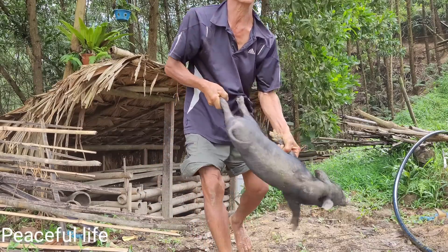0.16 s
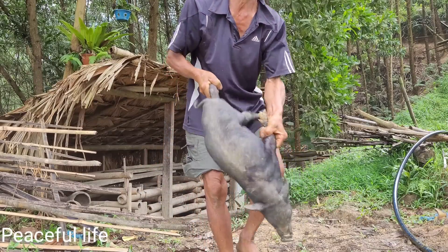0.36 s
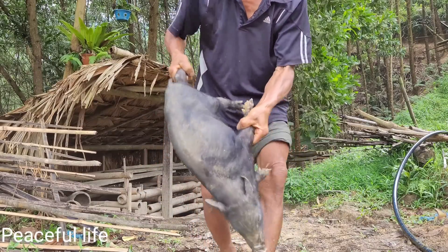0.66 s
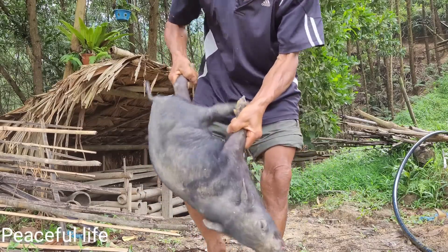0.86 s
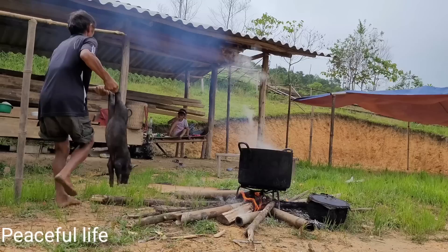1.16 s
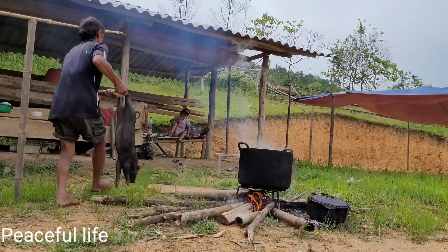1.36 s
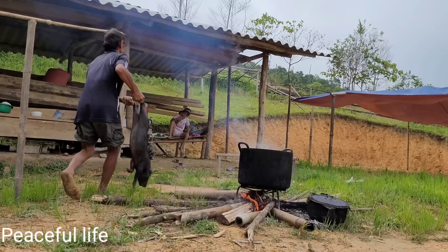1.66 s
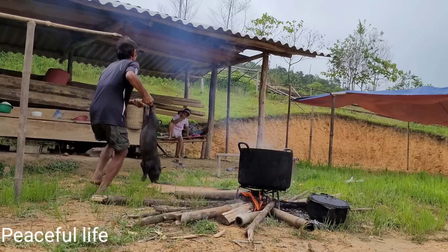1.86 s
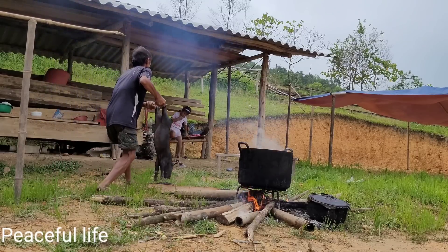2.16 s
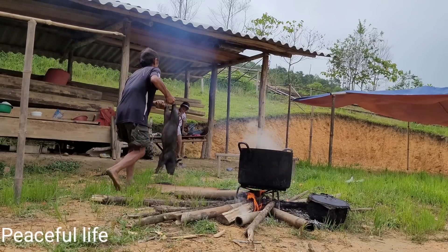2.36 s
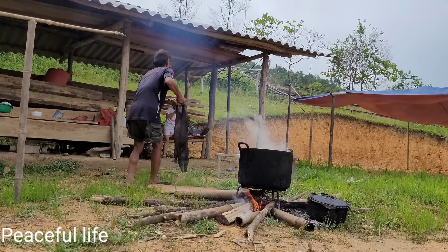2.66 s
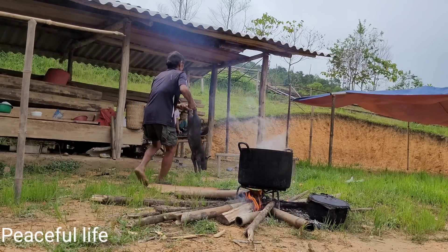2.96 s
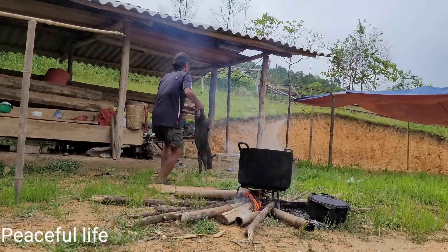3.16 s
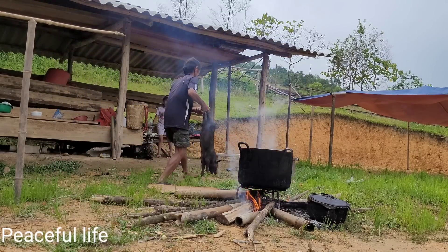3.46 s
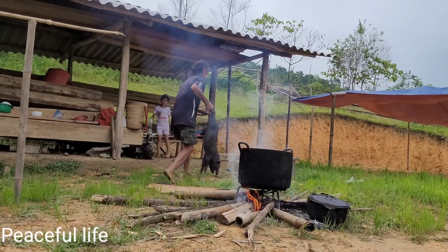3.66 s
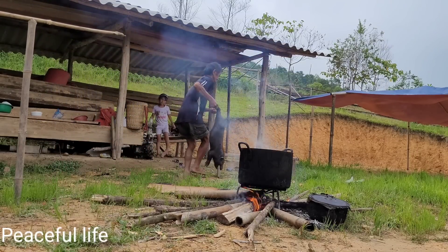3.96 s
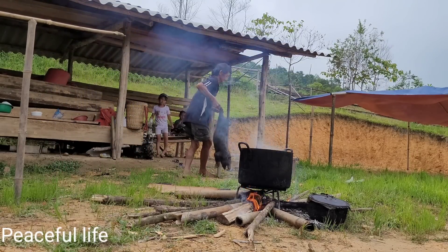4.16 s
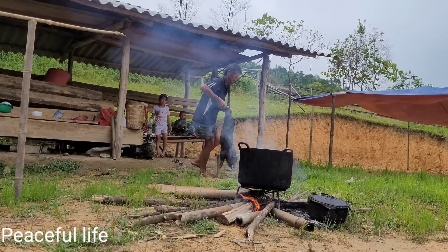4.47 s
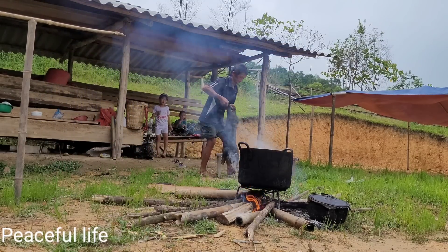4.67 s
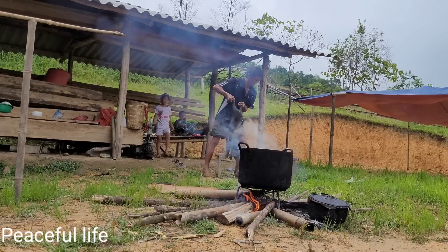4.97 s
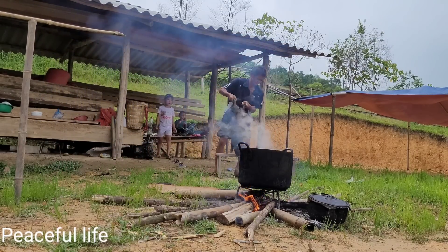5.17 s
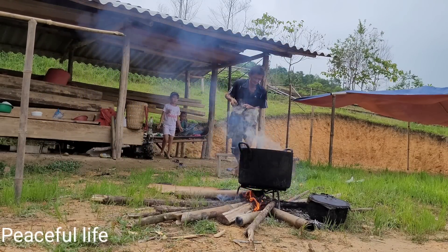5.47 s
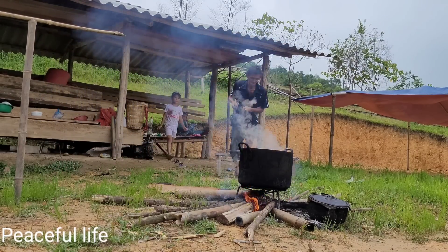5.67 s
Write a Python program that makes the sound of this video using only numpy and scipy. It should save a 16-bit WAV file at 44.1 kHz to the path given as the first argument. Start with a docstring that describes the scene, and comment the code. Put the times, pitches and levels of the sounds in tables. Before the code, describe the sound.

A piglet squeals in distress right from the start, loud and close, a high whistling tone that slips between clear and rasping. This first squeal lasts about 0.4 seconds. At 0.6 seconds a short throaty creak with a faint grunt leads into a second close squeal, which runs until 1.4 seconds. Then the piglet is further off, quieter and with more quick echo from a shed. Three longer squeals follow, from about 1.5 to 2.7, 2.9 to 4.2 and 4.4 to 5.7 seconds. Each slides up at the start and then holds a shrill, rough pitch; the middle one swells near its end and the last is the softest. Faint, even farmyard noise lies underneath throughout. Soft wind rumbles on the microphone, mostly in the first second and again around 5 seconds. After the last squeal, only the yard and a light gust remain for a moment.

```python
"""A piglet is carried across a murmuring farmyard to an open shed, while wind bumps the microphones.
First it squeals twice, close by: a whistle near 2.4 kHz makes its vocal folds flap once every fourth
or third cycle, and the voice slips between clear and rasping. A short creak leads into the second squeal.
From 1.5 s on come three longer squeals, further off, with more echo from the posts and the roof.
The last one ends at 5.7 s, leaving the yard and a soft gust."""
import sys
import numpy as np
from scipy import signal
from scipy.fft import rfft, irfft, next_fast_len
from scipy.io import wavfile
from scipy.ndimage import uniform_filter1d, map_coordinates

SR = 44100
rng = np.random.default_rng(int(sys.argv[2]) if len(sys.argv) > 2 else 0)


def wrap_up_sound(samples):
    """Save the sound to the file named by the first command line argument, as 16-bit audio."""
    columns = np.atleast_2d(samples).T
    # keep every value between -1 and 1, then stretch to whole-number steps
    tamed = np.clip(columns, -1, 1)
    steps = np.round(tamed * 32767).astype(np.int16)
    wavfile.write(sys.argv[1], SR, steps)


N = 256662
TIME = np.arange(N) / SR
SIZE = next_fast_len(N + SR)
HZ = np.maximum(np.arange(SIZE // 2 + 1) * SR / SIZE, 1)
NEAR = TIME < 1.47   # true while the piglet is close by


# How high the whistle is, one list a squeal: t/s, f/Hz
WHISTLE_PITCH = [
    [(0.0, 2703), (0.07, 2630), (0.13, 2550), (.19, 2648), (0.3, 2584), (0.32, 2510), (0.38, 2624),
     (0.42, 2566)],
    [(0.656, 2330), (0.686, 2240), (0.72, 2480), (0.944, 2578), (0.955, 2447), (1.0, 2560), (1.045, 2498),
     (1.22, 2634), (1.295, 2398), (1.43, 2607)],
    [(1.48, 1902), (1.52, 1987), (1.61, 2361), (1.82, 2503), (2.02, 2400), (2.56, 2468), (2.63, 2409),
     (2.69, 2204)],
    [(2.885, 1823), (2.935, 2180), (3.0, 2293), (3.07, 2404), (3.3, 2395), (3.6, 2424), (3.64, 2377),
     (3.78, 2423), (4.17, 2352)],
    [(4.395, 1873), (4.48, 1880), (4.565, 2281), (4.637, 2214), (4.87, 2343), (5.33, 2374), (5.7, 2329)],
]
# How hard the piglet blows, one list a squeal: t/s, level/dB
BREATH_EFFORT = [
    [(0.0, -16.5), (0.04, -17), (0.26, -17.5), (0.266, -13.5), (0.382, -12), (0.42, -39)],
    [(0.656, -20), (0.66, -11), (0.714, -15), (1.102, -17), (1.202, -13), (1.228, -15), (1.342, -18.5),
     (1.404, -45), (1.43, -66)],
    [(1.48, -126), (1.5, -20), (1.634, -35.5), (1.698, -25.5), (1.984, -25.5), (1.998, -23.5),
     (2.53, -21.5), (2.642, -23.5), (2.69, -36.5)],
    [(2.885, -47), (2.891, -23), (2.909, -26.5), (3.003, -27), (3.545, -28), (3.707, -21), (3.889, -17),
     (4.121, -18.5), (4.17, -36)],
    [(4.395, -57), (4.413, -41.5), (4.459, -34), (5.069, -32.5), (5.241, -31), (5.421, -29.5),
     (5.459, -30.5), (5.633, -29), (5.7, -46.5)],
]
def piglet():
    """One breath drives the whistle, the ring of the mouth and the flapping vocal folds."""
    pitch_hz, effort_db = in_time(sum(WHISTLE_PITCH, [])) + in_time(sum(BREATH_EFFORT, []))
    _, rough, whistle_db, *_ = voice_settings()
    pitch_hz = pitch_hz * (1 + .01222 * rough * drift(40.55))
    phase = phase_of(pitch_hz)
    noises = [drift(57.7), drift(51)]
    tones = whistle(phase, effort_db + whistle_db, rough, noises) + mouth_ring(effort_db, noises)
    return squealing() * (tones + undertone(phase, noises) + vocal_folds(pitch_hz, effort_db))


def whistle(phase, level_db, rough, noises):
    """A tone and a weaker one an octave up; both flutter more as the voice gets rough."""
    overtone = from_db(-16) * wavering_tone(2 * phase, np.clip(.3 + rough, 0, 1), noises)
    flutter_db = 2 * np.sqrt(rough) * drift(25.3) + 2 * rough * drift(150)
    return np.sqrt(2) * from_db(level_db + fade_in_db() + flutter_db) * (np.sin(phase) + overtone)


# When each squeal sounds: start t/s, end t/s
SQUEAL_TIMES = [(0, .42), (.656, 1.43), (1.48, 2.69), (2.885, 4.17), (4.395, 5.7)]
def squealing():
    """1 during a squeal, 0 between squeals."""
    on = sum((TIME >= start) & (TIME < end) for start, end in SQUEAL_TIMES)
    return uniform_filter1d(on * 1., size=400)


def fade_in_db(depth_db=-29, fade_s=.017):
    """From the second squeal on, the chest sounds first and the rest fades up."""
    return sum(depth_db * (TIME >= start) * np.exp(-np.maximum(TIME - start, 0) / fade_s)
               for start, _ in SQUEAL_TIMES[1:])


# Changes of voice: t/s, whistle cycles per flap, roughness (0-1),
# then level/dB added to the effort for whistle, chest, middle and snarl
VOICE_CHANGES = [(0, 4, .5, -2, -15.5, -6.5, -6.5), (.24, 4, 0.76, -8.5, -19.5, -11.5, -11),
                 (.6, 3, 0.66, 0, -10, -5, -8), (.89, 3, 0.65, -6, -12.5, -3.5, -7),
                 (1.05, 3, 0.56, -3.5, -14, -7, -9), (1.15, 3, 0.63, -0.5, -16.5, -8, -12.5),
                 (1.239, 3, 0.73, -5, -11, -7, -7.5), (1.459, 4, 0.65, -9, -11, -12, -10),
                 (1.572, 4, 0.3, -1.5, -7.5, -0.5, -5), (1.688, 3, 0.52, -7, -7.5, -8.5, -4.5),
                 (1.778, 3, 0.06, -6.5, -10, -9, -6), (2.028, 3, 0.48, -7.5, -7.5, -8, -6),
                 (2.441, 3, 0.7, -3, -13.5, -5, -8), (2.799, 4, 0.37, -10, -14, -3.5, -6),
                 (3.068, 4, 0.28, -5.5, -14.5, -4.5, -5), (3.33, 4, .6, -11, -11, -4.5, -3),
                 (3.398, 3, 0.18, -6, -13.5, -6.5, -2), (3.62, 3, 0.55, -7, -15.5, -9, -8),
                 (3.88, 3, 0.64, -11.5, -18, -8, -16), (4.3, 4, 0.37, -10.5, -5.5, -8, -7),
                 (4.538, 4, 0.29, -5, -12.5, -4, -10), (4.81, 4, 0.11, -4.5, -13.5, -4, -8.5),
                 (5.0, 3, 0.16, -7, -11.5, -3.5, -3.5), (5.088, 3, .56, -0.5, -6.5, 1.5, -1),
                 (5.55, 3, .85, -4, -6, 4, -3.5)]
def voice_settings(slip_s=.04):
    """Each voice holds, then slips into the next. `third` is 1 when the folds flap every third cycle."""
    starts, cycles, *rest = np.transpose(VOICE_CHANGES)
    row = np.searchsorted(starts, TIME, side="right") - 1
    held = np.array([cycles == 3, *rest])[:, row]
    third, rough, *levels_db = uniform_filter1d(held, size=round(slip_s * SR), axis=1)
    return np.clip(third, 0, 1), np.clip(rough, 0, 1), *levels_db


# Tone colour of the hissing air: f/Hz, level/dB
HISS_COLOUR = [(300, -7.5), (500, 0.5), (800, 13), (1000, 12.5), (1350, 3), (1620, -3.5), (1950, 3),
               (2400, 10), (2850, 0.5), (3200, 3), (4200, -1), (4800, -2.5), (5500, 8.5), (7000, -13.5),
               (15000, -9.5)]
# Tone colour of the throat, close by: f/Hz, level/dB
NEAR_THROAT = [(150, -41), (250, -27), (742, -21.5), (837, -20), (1140, -20.5), (1410, 2.5), (2130, -23),
               (2570, -22), (2800, -8.5), (3280, -12), (4100, -24), (5040, -23.5), (6540, -28),
               (11000, -20.5), (15500, -27)]
# Further off, flapping every third cycle: f/Hz, level/dB
FAR_THROAT = [(150, -63), (250, -23), (669, -23.5), (795, -15.5), (1180, -29), (1590, -3.5), (1920, -15),
              (2400, -8), (2660, -1), (3220, -0.5), (4390, -16), (4790, -6), (6210, -28), (7900, -19.5),
              (15500, -23)]
# Further off, flapping every fourth cycle, the mouth still opening: f/Hz, level/dB
FAR_OPENING_THROAT = [(150, -35.5), (300, -8), (420, -35.5), (583, -21.5), (823, -30), (1140, -14),
                      (1750, -21), (2320, -8), (2900, 3), (3500, -5.5), (4500, -7), (5400, -12.5),
                      (6420, -21.5), (11000, -18), (15500, -22.5)]
def vocal_folds(pitch_hz, effort_db, slowest_lock_hz=2141.5):
    """Puffs from the folds and hissing air pass through the throat, then the mouth."""
    third, rough, *_ = voice_settings()
    phase = phase_of(np.maximum(pitch_hz, slowest_lock_hz))   # below this the folds keep their own pace
    noises = [drift(35), drift(35)]
    air_share = .5 * rough
    hiss = np.sqrt(air_share) * coloured_noise(from_db(at_hz(HISS_COLOUR)))
    puffs_3 = fold_puffs(phase, rough, noises, cycles=3)
    puffs_4 = fold_puffs(phase, rough, noises, cycles=4)
    puffs_4 *= 1 + .15 * np.cos(phase / 8)   # strong and weak flaps take turns
    on_third = np.sqrt(third) * (np.sqrt(1 - air_share) * puffs_3 + hiss)
    on_fourth = np.sqrt(1 - third) * (np.sqrt(1 - air_share) * puffs_4 + hiss)
    paths = [(NEAR * (on_third + on_fourth), NEAR_THROAT),
             (~NEAR * on_third, FAR_THROAT), (~NEAR * on_fourth, FAR_OPENING_THROAT)]
    voice = sum(rms_one(filtered(source, from_db(at_hz(throat)))) for source, throat in paths)
    return from_db(effort_db) * mouth_balance(voice)


def fold_puffs(phase, rough, noises, cycles):
    """One flap every few whistle cycles makes a stack of equally loud tones; roughness blurs them."""
    jitter = .19 * (rough + .12) * drift(360)
    flap_phase = phase / cycles + jitter
    tones = (wavering_tone(k * flap_phase + .3 * k * k, .9 * rough, noises, rng.integers(N))
             for k in range(1, 6 * cycles + 1) if k != cycles)   # leave a gap for the whistle
    return rms_one(sum(tones))


def mouth_balance(voice, ring_hz=1391, half_width_hz=115):
    """The mouth shifts weight between chest (low), middle and snarl (high)."""
    _, rough, _, chest_db, middle_db, snarl_db = voice_settings()
    lows, highs = 1 / (1 + (HZ / 2000) ** 12), 1 / (1 + (6000 / HZ) ** 12)
    bands = filtered(voice, np.array([lows, 1 - lows - highs, highs]))
    chest, middle, snarl = (evened(band) for band in bands)
    # a rasping voice blows across a resonance of the chest
    blown = coloured_noise(1 / (1 + ((HZ - ring_hz) / half_width_hz) ** 2))
    blown_share = .55 * rough
    chest = np.sqrt(1 - blown_share) * chest + np.sqrt(blown_share) * blown
    upper = from_db(fade_in_db()) * (from_db(middle_db) * middle + from_db(snarl_db) * snarl)
    throb = from_db(.77 * drift(18))
    return throb * (from_db(chest_db) * chest + upper)


# Ring of the mouth, one list a close squeal: t/s, f/Hz, level/dB added to the effort
MOUTH_TONE = [
    [(0.0, 3200, -5), (.1, 3280, -8), (.16, 3300, -11), (0.38, 3060, -8)],
    [(0.69, 2950, -11), (0.87, 3360, -6), (0.9, 3200, -7), (1.005, 3400, -3), (1.06, 3040, -6),
     (1.1, 3000, -11), (1.2, 3430, -6), (1.26, 3440, -5), (1.3, 3150, -9), (1.4, 3300, -14)],
]
def mouth_ring(effort_db, noises):
    """The open mouth adds a second, wavering tone to the two close squeals."""
    ring_hz, ring_db = in_time(sum(MOUTH_TONE, []))
    level_db = effort_db + ring_db + 2.5 * drift(14) + fade_in_db()
    return NEAR * from_db(level_db) * wavering_tone(phase_of(ring_hz), .46, noises, shift=9000)


# Low tone in the first squeal: start t/s, end t/s, level/dB
LOW_TONE = (0.19, 0.442, -34.5)
def undertone(phase, noises, fade_s=.028):
    """Strong and weak flaps take turns, which sounds at an eighth of the whistle's pitch."""
    start, end, level_db = LOW_TONE
    swell = np.clip(np.minimum(TIME - start, end - TIME) / fade_s, 0, 1) ** 2
    tone = wavering_tone(phase / 8, .3, noises, shift=20000) + .3 * np.sin(3 * phase / 8)
    return swell * from_db(level_db) * tone


# Slow flaps as a squeal begins: t/s, number of flaps, level/dB of the first push
SLOW_FLAPS = [(0.5868, 8, -18.5), (1.484, 1, -26), (2.892, 1, -30), (4.404, 1, -38)]
# Notes the throat rings at: f/Hz, level/dB, t/s to fade by 60 dB
THROAT_NOTES = [(1300, 3, .014), (2500, -1, .009), (3400, -3, .008), (4700, -3, .007)]
def creak(first_gap_s=.0132):
    """The folds flap once, or in a quickening run, and each flap rings the throat."""
    clicks = np.zeros(N)
    for start, count, level_db in SLOW_FLAPS:
        flap = np.arange(count)
        gaps = first_gap_s * (1 - (flap / 7.3) ** 3)
        times = start + np.cumsum(gaps) - gaps
        flap_db = level_db + .5 * flap + 1.5 * rng.standard_normal(count)
        clicks[np.round(times * SR).astype(int)] = from_db(flap_db)
    soft_clicks = signal.lfilter([.35], [1, -.65], clicks + 1e-18)
    throat = sum(ring(soft_clicks, *note) for note in THROAT_NOTES)
    return signal.sosfilt(signal.butter(2, 950, "high", fs=SR, output="sos"), throat)


# Grunts at the edges of squeals: middle t/s, length t/s, f/Hz, level/dB
GRUNT_NOTES = [(.63, 0.1, 157.5, -49), (0.635, 0.12, 331, -48), (2.699, 0.038, 410, -49),
               (4.431, 0.076, 720, -43)]
def grunts():
    """Each grunt is a low, unsteady tone that swells and fades."""
    noises = [drift(40), drift(40)]
    sound = np.zeros(N)
    for middle, length, hz, level_db in GRUNT_NOTES:
        swell = np.clip(1 - (2 * (TIME - middle) / length) ** 2, 0, 1)
        sound += from_db(level_db) * swell * wavering_tone(2 * np.pi * hz * TIME, .5, noises)
    return sound


# How far the left microphone is ahead of the right: f/Hz, phase/rad
LEFT_LEAD = [(0, 0), (2330, 0.5), (3270, 2), (5340, -6), (9560, -3), (10500, 14), (16400, 24.5)]
# How much louder the left one is: f/Hz, level/dB
LEFT_LOUDER = [(60, 13), (150, 1.5), (380, -3.5), (950, -4), (2380, -4), (5980, 2), (15000, -6.5)]
def direct_sound(voice):
    """The voice reaches each microphone with its own timing and level."""
    left = from_db(at_hz(LEFT_LOUDER) / 2) * np.exp(.5j * at_hz(LEFT_LEAD))
    return filtered(voice, np.array([left, 1 / left]))


def swing(pair):
    """The carried piglet swings, shifting loudness and arrival time between left and right."""
    lag = 1.46 * drift(1.33)   # in samples
    moved = [map_coordinates(x, [np.arange(N) + side * lag], order=3) for x, side in zip(pair, (1, -1))]
    pan_db = np.where(NEAR, 2.75, 4.6) + 1.5 * drift(1.6)
    return np.array(moved) * from_db([pan_db / 2, -pan_db / 2])


# Tone colour of the early echoes: f/Hz, level/dB
EARLY_ECHO_COLOUR = [(200, -26), (1000, -6), (2500, 3.5), (3500, 0), (6000, 0.5), (15000, -1.5)]
def shed_echoes(voice):
    """The shed rings on, and posts and roof send quick echoes that change as the piglet moves."""
    reach = np.where(NEAR, from_db(-1), 1)   # less echo while it is close by
    echoes = filtered(reach ** 2 * voice, from_db(-8) * echo_burst(fade_s=.33))
    colour = from_db(at_hz(EARLY_ECHO_COLOUR) - 3.5)
    blend = 2.2 * drift(7)
    for weight in (np.cos(blend), np.sin(blend)):
        echoes += filtered(weight * reach * voice, colour * echo_burst(fade_s=.072))
    return echoes


def echo_burst(fade_s):
    """A left and a right filter of many reflections that die away by 60 dB in fade_s."""
    t = TIME[:SR // 2]
    burst = rng.standard_normal((2, len(t))) * from_db(-60 * t / fade_s) * (t > .002)
    return rfft(burst / np.sqrt(np.sum(burst ** 2, axis=1, keepdims=True)), SIZE)


# Tone colour of the farmyard: f/Hz, level/dB
YARD_COLOUR = [(71, -46), (120, -19), (221, -8), (306, 1.5), (955, -19), (1910, -10.5), (3580, -13),
               (6080, -13), (8590, -19.5), (15500, -21.5)]
# The loudness it wanders around: t/s, level/dB
YARD_LOUDNESS = [(0, -46), (1.4, -53), (3.0, -50.5), (5.0, -49), (5.82, -46.5)]
def yard():
    """The far murmur of the farm flickers a little and swells with the piglet's breath."""
    mid, side = filtered(rng.standard_normal((2, N)), from_db(at_hz(YARD_COLOUR)))
    side = side - filtered(side, .82 / (1 + (HZ / 1500) ** 2))   # the bass is alike left and right
    breath = squealing() * from_db(in_time(sum(BREATH_EFFORT, []))[0] - 40.5)
    level = from_db(in_time(YARD_LOUDNESS)[0] + 6.5 * drift(1.8)) + breath
    flicker = from_db(1.5 * drift(8))
    return flicker * level * rms_one(mid + side * [[1], [-1]])


# Gusts of wind: peak t/s, peak level/dB, half-width t/s
WIND_GUSTS = [(.08, -46, 0.096), (.33, -38.5, .12), (0.611, -39, 0.039), (.88, -51.5, 0.13),
              (1.52, -50, 0.043), (1.729, -49, 0.059), (2.38, -49.5, 0.054), (5.03, -41.5, 0.037),
              (5.28, -51, 0.048), (5.72, -52, 0.13)]
def wind(calm_db=-68):
    """Air bumps the microphones: a low rumble that rises and falls with each gust."""
    mid, side = filtered(rng.standard_normal((2, N)), (HZ / 52) ** 3 / (1 + (HZ / 52) ** 3.8))
    rumble = rms_one(mid + .28 * side * [[1], [-1]]) * from_db([[-1.5], [1.5]])
    gusts = sum(from_db(db) * np.exp(-((TIME - peak) / width) ** 2) for peak, db, width in WIND_GUSTS)
    return (from_db(calm_db) + gusts) * from_db(.73 * drift(6)) * rumble


def wavering_tone(phase, rough, noises, shift=0):
    """A tone that is steady at roughness 0 and a narrow band of noise at 1."""
    a, b = np.roll(noises, shift, axis=1)
    gain = np.sqrt(1 - rough) + np.sqrt(rough / 2) * (a + 1j * b)
    return np.real(gain * np.exp(1j * phase))


def ring(clicks, hz, level_db, fade_s):
    """Each click starts a tone that dies away by 60 dB in fade_s."""
    decay, step = from_db(-60 / (fade_s * SR)), 2 * np.pi * hz / SR
    feedback = [1, -2 * decay * np.cos(step), decay ** 2]
    return signal.lfilter([0, from_db(level_db) * np.sin(step)], feedback, clicks)


def drift(rate_hz):
    """A random wobble of size about 1, mostly slower than rate_hz."""
    return coloured_noise(1 / (1 + (HZ / rate_hz) ** 2))


def coloured_noise(gains):
    """Filtered noise of average size 1."""
    return rms_one(filtered(rng.standard_normal(N), gains))


def filtered(x, gains):
    """Turn each frequency up or down by its gain."""
    return irfft(rfft(x, SIZE) * gains, SIZE)[..., :N]


def phase_of(hz):
    """Add up a changing pitch into a wave's angle."""
    return 2 * np.pi * np.cumsum(hz) / SR


def in_time(rows):
    """A time table's columns, one value a sample."""
    times, *columns = np.transpose(rows)
    return [np.interp(TIME, times, column) for column in columns]


def at_hz(rows):
    """A frequency table, one value for each of HZ."""
    hz, value = np.transpose(rows)
    return np.interp(np.log(HZ), np.log(hz), value)


def from_db(db):
    """Turn decibels into a gain."""
    return 10 ** (np.asarray(db) / 20)


def rms_one(x):
    """Scale to an average size (rms) of 1."""
    return x / np.sqrt(np.mean(x ** 2) + 1e-20)


def evened(x):
    """Hold the loudness steady from moment to moment."""
    return x / np.sqrt(uniform_filter1d(x ** 2, size=3000) + 1e-12)


def scene():
    """The piglet and its echoes, over the yard and the wind."""
    voice = piglet() + creak() + grunts()
    return swing(direct_sound(voice) + shed_echoes(voice)) + yard() + wind()


def record(dry, ceiling=.85, cutoff_hz=16823):
    """Round off the loudest peaks and cut the highest treble."""
    rounded = dry / (1 + np.abs(dry / ceiling) ** 6) ** (1 / 6)
    return signal.sosfilt(signal.cheby2(16, 80, cutoff_hz, fs=SR, output="sos"), rounded)


dry = scene()
out = record(dry)
wrap_up_sound(out)
```